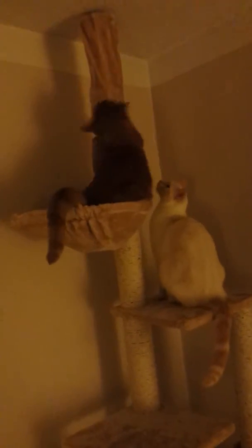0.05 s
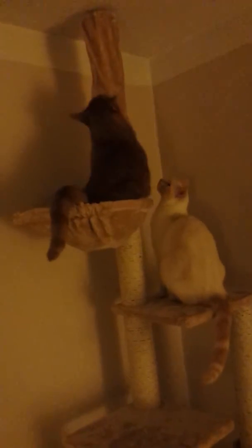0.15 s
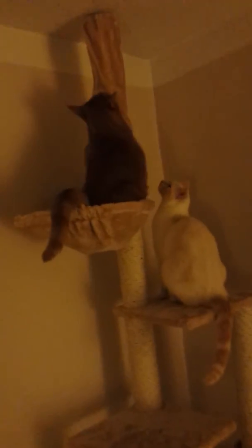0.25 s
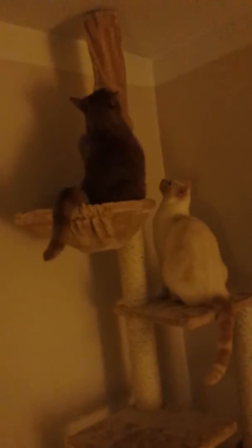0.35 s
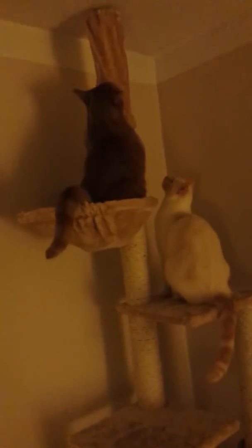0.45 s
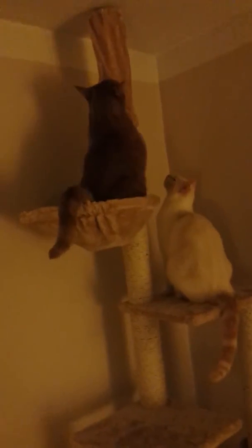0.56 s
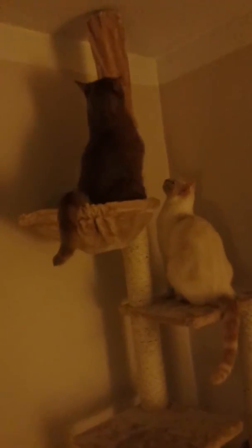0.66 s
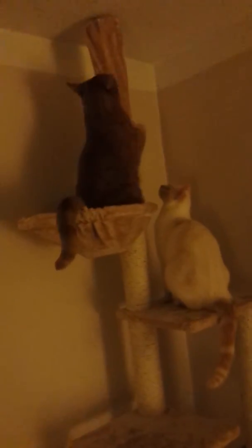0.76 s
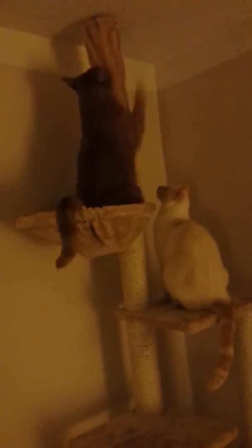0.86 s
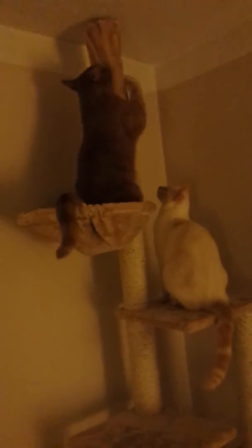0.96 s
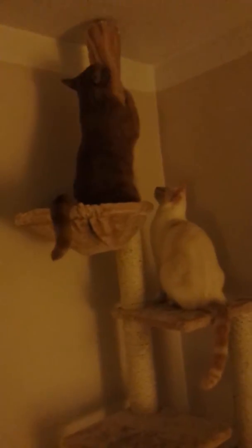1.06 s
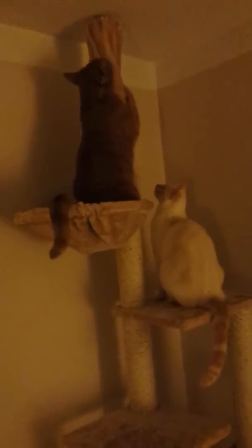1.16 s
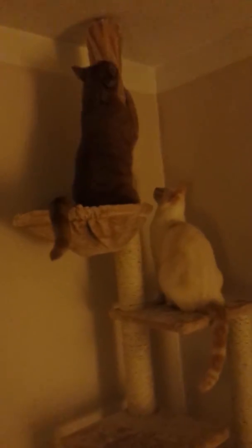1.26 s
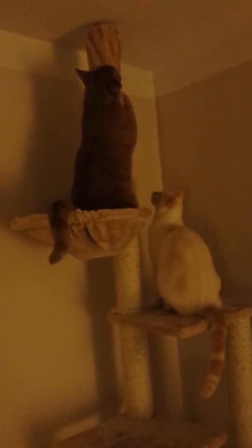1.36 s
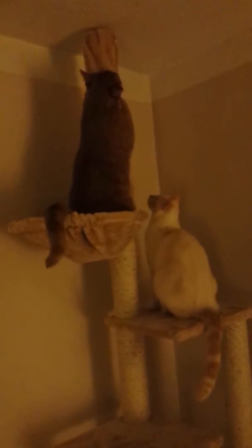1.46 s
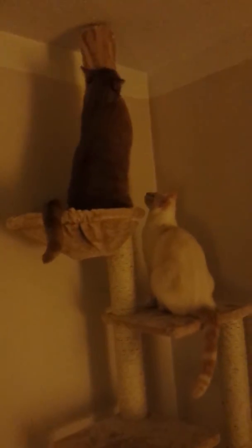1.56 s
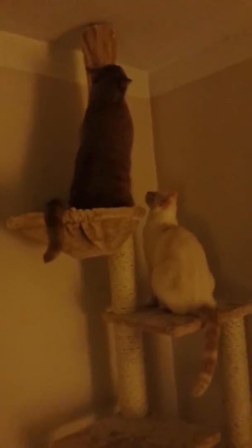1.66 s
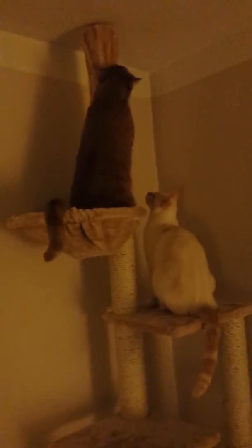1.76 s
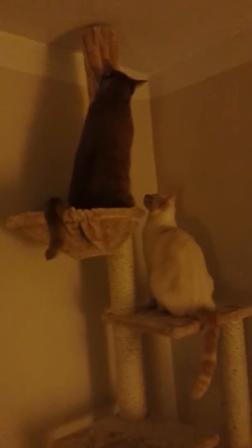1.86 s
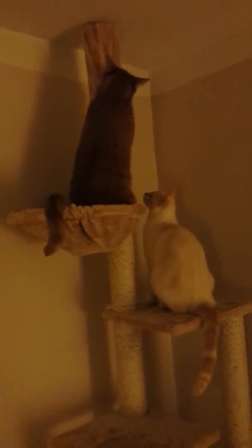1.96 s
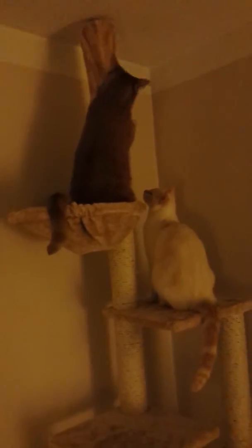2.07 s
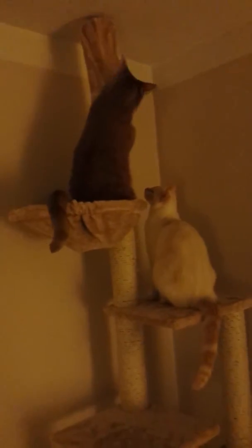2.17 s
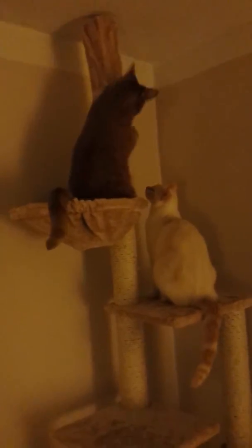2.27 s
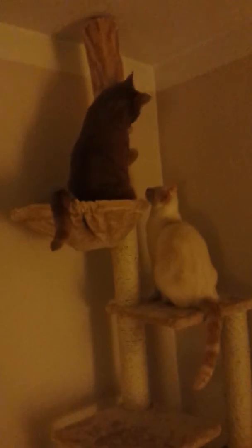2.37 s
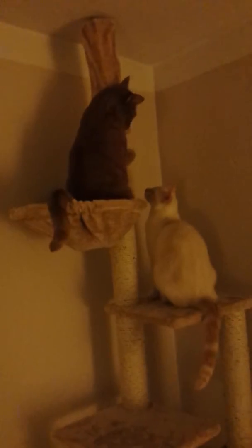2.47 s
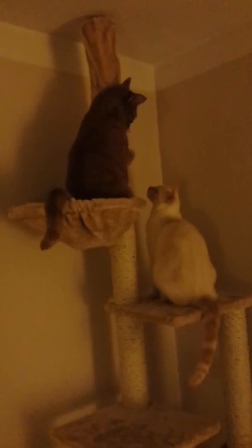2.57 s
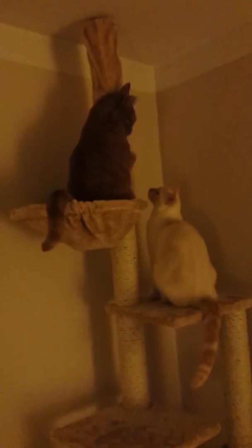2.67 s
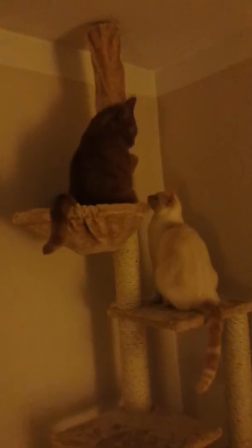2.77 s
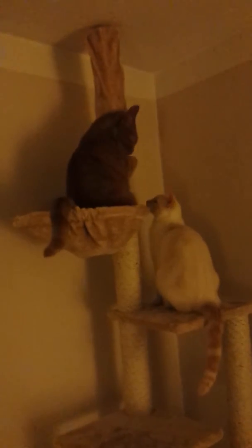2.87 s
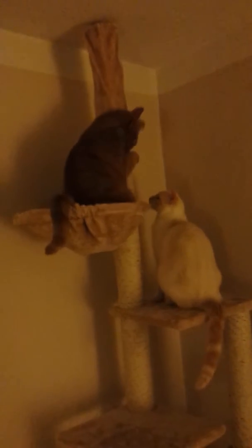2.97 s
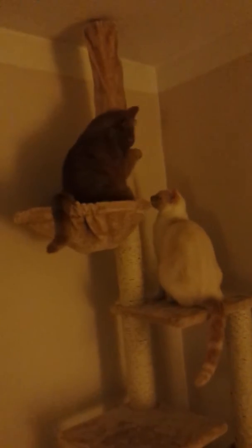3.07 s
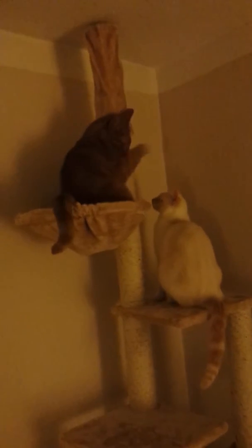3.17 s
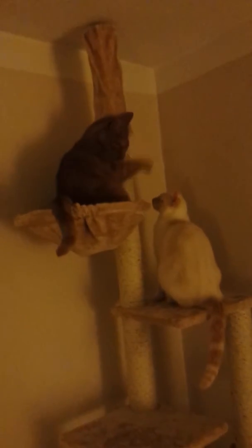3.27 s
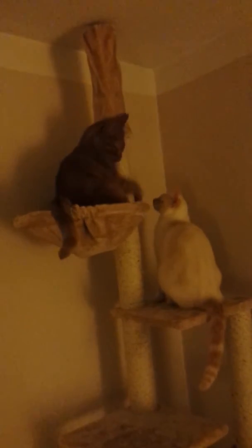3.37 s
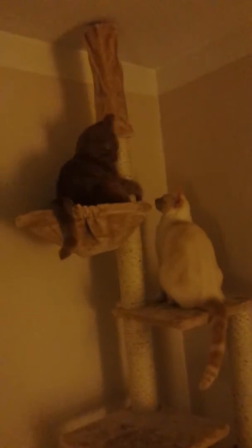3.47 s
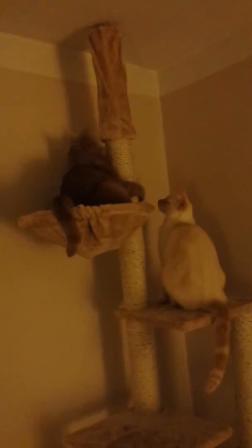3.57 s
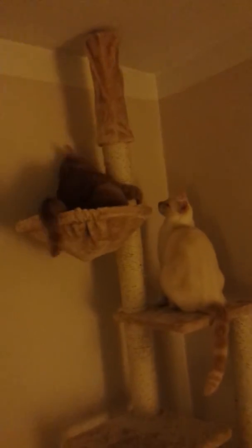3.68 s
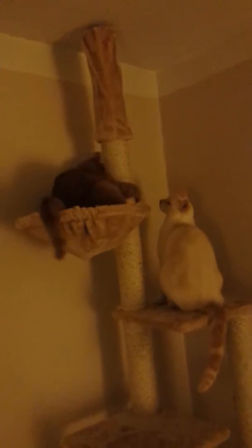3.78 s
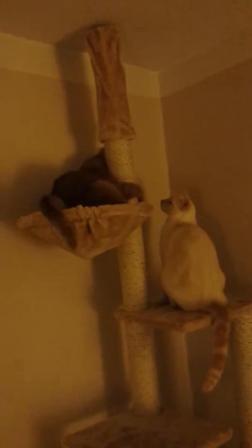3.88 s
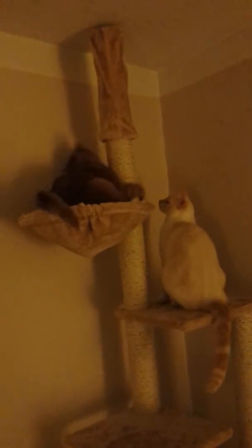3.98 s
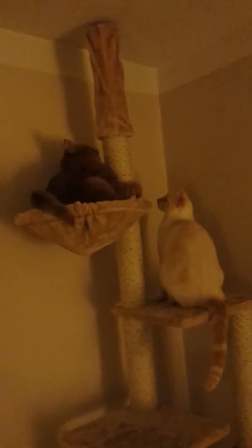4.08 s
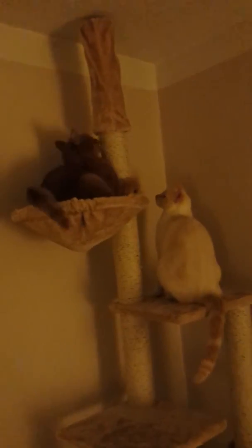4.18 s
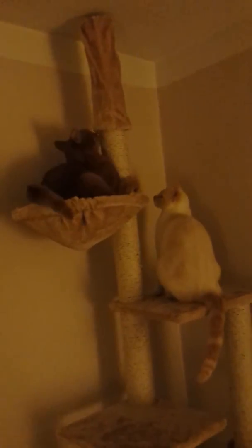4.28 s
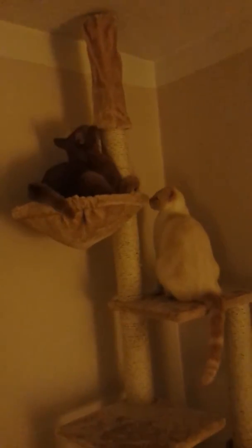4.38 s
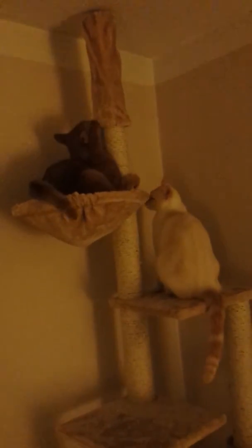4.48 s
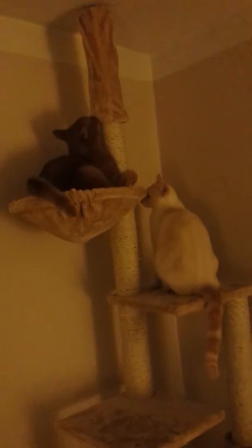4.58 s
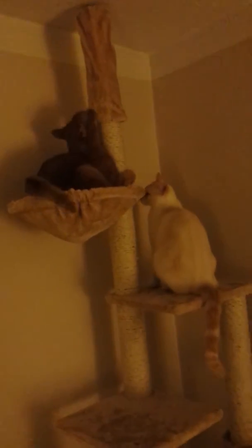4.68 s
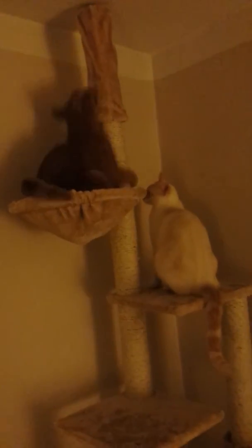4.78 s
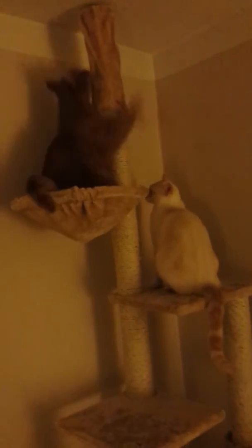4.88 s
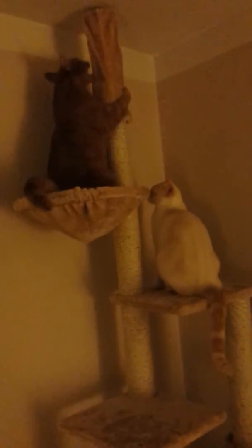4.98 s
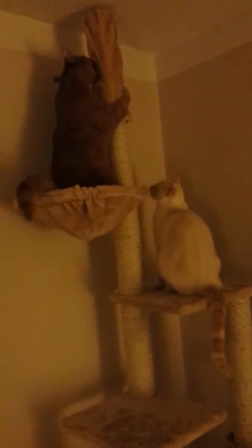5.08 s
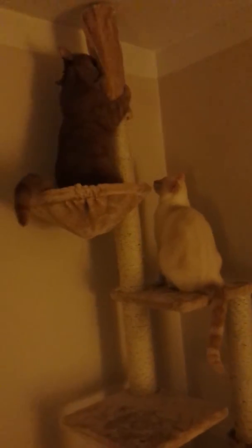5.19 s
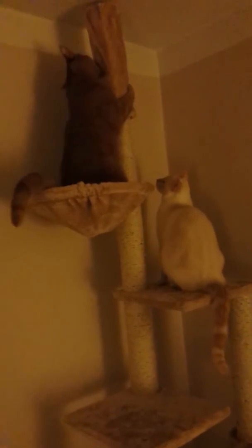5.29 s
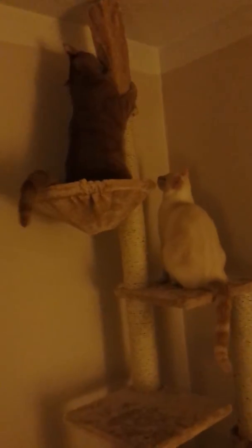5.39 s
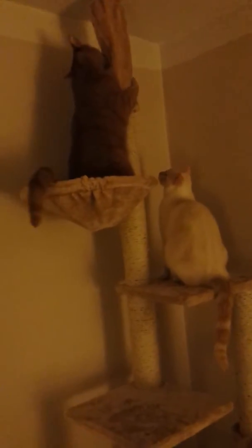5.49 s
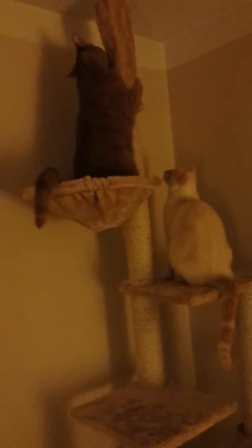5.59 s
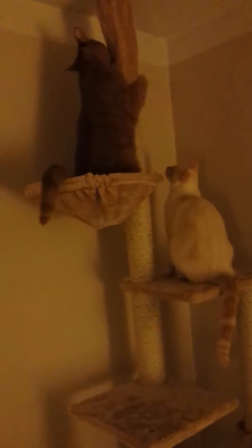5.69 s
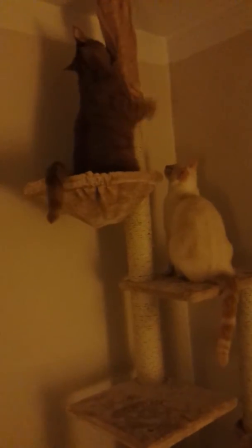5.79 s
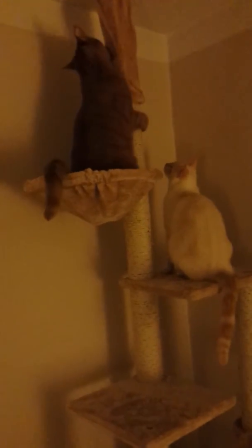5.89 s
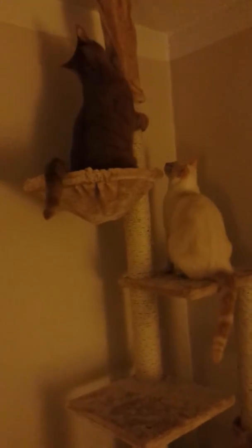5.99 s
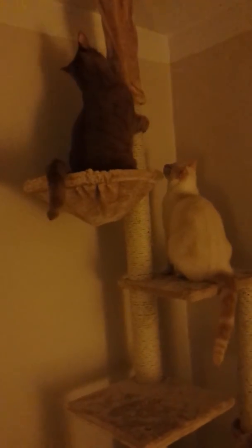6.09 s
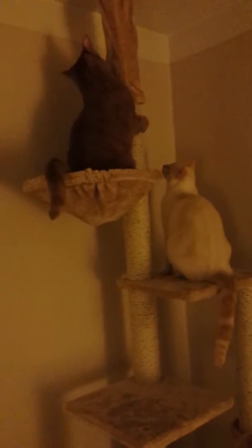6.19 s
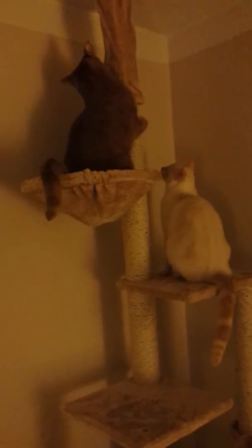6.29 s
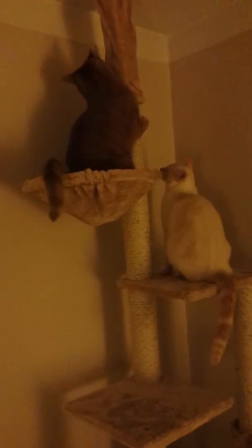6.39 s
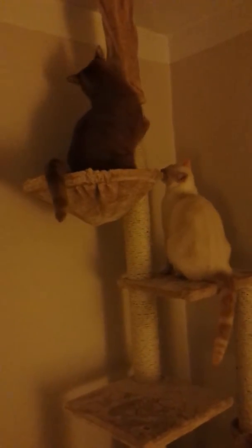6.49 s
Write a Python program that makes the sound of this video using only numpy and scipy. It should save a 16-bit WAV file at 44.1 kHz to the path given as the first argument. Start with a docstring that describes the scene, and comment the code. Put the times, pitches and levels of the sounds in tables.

```python
"""Cat on a scratching tree

A cat clambers about the top of a carpeted scratching tree in a quiet room.
Claws snag in the sisal and snap free: short noise bursts, coloured as tick, crack and pluck.
Paws and weight thump the hollow posts and boards, which ring as a set of fading sine waves.
Fur and plush rub as uneven noise, and joints creak as rough, wandering tones.
The tree stands in a corner, a little to the right, so echoes and a short room ring follow.
"""
import sys
import numpy as np
from scipy import signal
from scipy.fft import rfft, irfft
from scipy.io import wavfile
from scipy.ndimage import uniform_filter1d

SR = 44100
rng = np.random.default_rng(int(sys.argv[2]) if len(sys.argv) > 2 else 0)


def to_wav(s):
    """Save 16-bit WAV."""
    ch = np.atleast_2d(s).T  # columns
    pcm = np.round(np.clip(ch, -1, 1) * 32767)  # PCM
    wavfile.write(sys.argv[1], SR, pcm.astype(np.int16))


N = 288414
TIME = np.arange(N) / SR  # seconds


def from_db(db):
    """Turn decibels into a gain."""
    return 10 ** (np.asarray(db) / 20)


def rms_one(x):
    """Scale a sound to an average strength (rms) of 1."""
    return x / np.sqrt(np.mean(x ** 2) + 1e-20)


def at_hz(points, hz):
    """Read a table between its points, with frequency on a log axis."""
    f, value = np.transpose(points)
    return np.interp(np.log(np.maximum(hz, 1)), np.log(f), value)


def add(track, s, sound):
    """Mix a sound into a track, starting at s seconds."""
    i = int(s * SR)
    track[i:i + len(sound)] += sound[:N - i]


def delayed(x, s):
    """The same sound, s seconds later."""
    return np.pad(x, (max(round(s * SR), 0), 0))[:N]


def lowpass(x, hz):
    """Second-order low-pass: keep what lies below hz."""
    return signal.sosfilt(signal.butter(2, min(hz, .45 * SR), fs=SR, output="sos"), x)


def bandpass(x, low_hz, high_hz):
    """Keep a band of frequencies, with second-order skirts on both sides."""
    band_hz = [low_hz, min(high_hz, .45 * SR)]
    return signal.sosfilt(signal.butter(2, band_hz, "band", fs=SR, output="sos"), x)


def colour(x, spectrum, size=2048):
    """Give a sound a spectrum with a filter of unit energy that acts as early as it can (minimum phase)."""
    gain = from_db(at_hz(spectrum, np.fft.rfftfreq(size, 1 / SR)))
    # folding the cepstrum forward in time makes the filter minimum-phase
    cepstrum = irfft(np.log(gain))
    cepstrum[1:size // 2] *= 2
    cepstrum[size // 2 + 1:] = 0
    response = irfft(np.exp(rfft(cepstrum)))
    return signal.fftconvolve(x, response / np.linalg.norm(response))[:len(x)]


# how alike left and right are in sound from all around. Columns: f/Hz, likeness (1 = the same)
LIKENESS = [(100, 0.854), (300, 0.826), (550, 0.678), (1000, 0.033), (14000, 0.059)]


def diffuse(size):
    """White stereo noise from all around: long bass waves reach both sides alike, short ones do not."""
    mid, side = rfft(rng.standard_normal((2, size)))
    alike = np.clip(at_hz(LIKENESS, np.fft.rfftfreq(size, 1 / SR)), -1, 1)
    shared = np.sqrt((1 + alike) / 2) * mid
    opposed = np.sqrt((1 - alike) / 2) * side * [[1], [-1]]
    return irfft(shared + opposed, size)


# spectrum of the room's background. Columns: f/Hz, relative level/dB per Hz
QUIET = [(15, -59.5), (28, -16.5), (40, -6), (54, 1), (75, -3.5), (140, -5.5), (205, -8.5), (330, -20.5),
         (420, -19), (480, -11.5), (560, -21.5), (2000, -26.5), (4000, -28), (7000, -25.5), (14500, -30)]


def quiet_background(level_db):
    """Steady noise from all around, coloured like the quiet room, at a set rms level."""
    noise = np.array([colour(side, QUIET, size=8192) for side in diffuse(N)])
    return from_db(level_db) * rms_one(noise)


# the cat stretches, turns or settles.
# Columns: start t/s, length/s, fur on plush relative level/dB, weight on boards relative level/dB
MOVES = [(0.052, 0.094, -74.5, -73), (0.269, 0.047, -68.5, -68.5), (0.381, 0.334, -66.5, -72.5),
         (0.79, 0.386, -61, -53.5), (1.606, 0.063, -66.5, -62), (1.868, 0.039, -65, -60.5),
         (1.987, 0.1623, -62.5, -60), (2.358, 0.265, -66.5, -61.5), (3.094, 0.244, -68.5, -59.5),
         (3.438, 0.284, -63.5, -66.5), (3.993, 0.279, -72, -67.5), (4.844, 0.079, -61.5, -59.5),
         (5.093, 0.357, -60.5, -45), (5.553, 0.2415, -60.5, -52.5), (5.958, 0.122, -67, -58)]
# every move swells and dies away alike
SWELL_DB_PER_S, FADE_DB_PER_S = 134.5, 64.5


def moving():
    """Gains of fur and of weight over time: each move swells, holds and fades."""
    gains = np.zeros((2, N))
    for s, length_s, fur_db, weight_db in MOVES:
        swell_db = SWELL_DB_PER_S * (TIME - s)
        fade_db = FADE_DB_PER_S * (s + length_s - TIME)
        shape = from_db(np.clip(np.minimum(swell_db, fade_db), -100, 0))
        gains = np.maximum(gains, from_db([[fur_db], [weight_db]]) * shape)
    return gains


# ways in which the posts and boards can ring (modes).
# Columns: f/Hz, relative level/dB, time to fade by 60 dB/s
TREE_MODES = [(55.4, -11, 0.52), (96, -13, 0.23), (145.41, -5.5, 0.256), (167.8, -10, 0.0895),
              (197.48, -7, 0.183), (225.1, -2.5, 0.13), (266.34, -3, 0.103), (279.6, 0.5, 0.1296),
              (304.7, 1, 0.0892), (330.1, -1, 0.0938), (389.76, -4.5, 0.1171), (456.35, -6.5, 0.0857),
              (523.2, -2, 0.1423), (665.1, -6, 0.151), (739.6, -14.5, 0.106), (882.5, -5, 0.155),
              (1001, -7, 0.126), (1142, -8.5, 0.07), (1540, -13, .12), (1687, 2, 0.29),
              (2270, -29.5, 0.158)]


def mode_waves():
    """Every mode of the posts and boards ringing and fading at its own level, one row each."""
    t = TIME[:SR // 2]
    hz, db, t60 = np.transpose(TREE_MODES)[:, :, None]
    return from_db(db - 60 * t / t60) * np.sin(2 * np.pi * hz * t)


def tree_ring(waves, centre_hz, scatter_db, below_db=3.0, above_db=10.5):
    """One blow on the tree: modes weaken per octave away from the contact's centre; unit energy."""
    octaves = np.log2(np.array(TREE_MODES)[:, 0] / centre_hz)
    slope_db = np.minimum(below_db * octaves, -above_db * octaves)
    db = slope_db + scatter_db * rng.standard_normal(len(waves))
    signs = rng.choice([-1, 1], len(waves))
    ring = (signs * from_db(db)) @ waves
    return ring / np.linalg.norm(ring)


def friction(per_s, spread_db, smooth):
    """Fibres catch and slip at random, over a smooth hiss; rms 1."""
    slips_now = rng.random(N) < per_s / SR
    sizes = from_db(spread_db * np.minimum(rng.exponential(1, N), 5)) * slips_now
    # the power of each slip dies away over about a millisecond
    slips = signal.lfilter([1], [1, -np.exp(-1 / (0.00108 * SR))], sizes ** 2 + 1e-18)
    strength = np.sqrt(slips / slips.mean() + smooth ** 2)
    return rms_one(strength * rng.standard_normal(N))


# spectrum of rubbed plush. Columns: f/Hz, relative level/dB per Hz
PLUSH = [(400, -4), (1000, -2), (2000, -4.5), (4500, -7), (6300, 2.5), (7500, 1), (9500, -6), (14500, -12)]
# paws swiping across the plush. Columns: start t/s, length/s, relative level/dB
SWIPES = [(0.718, 0.059, -54), (0.813, 0.04, -60), (0.882, 0.0436, -53.5), (1.016, 0.069, -52.5),
          (1.576, 0.0326, -61.5), (1.788, 0.0555, -59.5), (1.872, 0.0544, -60), (2.503, 0.0274, -63),
          (4.793, 0.0184, -57), (4.992, 0.086, -56.5), (5.094, 0.0465, -50), (5.713, 0.103, -57),
          (6.008, 0.0534, -59)]
# between moves the fur barely stirs: level relative to the same scale as the moves
STIR_DB = -91.5


def rubbing(hiss_gain_db, swipe_gain_db, drag_gain_db):
    """Fur hisses, swiping paws rasp, and the shifting weight's friction makes the boards murmur."""
    strokes = np.zeros(N)
    for s, length_s, db in SWIPES:
        stroke = np.sqrt(np.hanning(int(length_s * SR)))
        add(strokes, s, from_db(db + swipe_gain_db) * stroke)
    brush, weight = moving()
    fur_gain = (brush + from_db(STIR_DB)) * from_db(hiss_gain_db)
    fur = friction(per_s=250, spread_db=2.5, smooth=0.577) * fur_gain
    rasp = friction(per_s=600, spread_db=0.0, smooth=0.29) * strokes
    scrape = friction(per_s=300, spread_db=1.0, smooth=1.0)
    boards = tree_ring(mode_waves(), centre_hz=387, scatter_db=1.0)
    drag = signal.fftconvolve(scrape, boards)[:N]
    return colour(fur + rasp, PLUSH), rms_one(drag) * weight * from_db(drag_gain_db)


def fibre_burst(length_s):
    """A claw rips fibres within milliseconds: noise nearly even over frequency, of unit energy."""
    t = TIME[:SR // 20]
    swell = t * np.exp(-t / max(length_s, .0001))
    # keep only the phases of a short noise, so that all frequencies are equally strong
    phases = np.angle(rfft(rng.standard_normal(len(t)) * swell))
    burst = irfft(np.exp(1j * phases), len(t)) * np.sqrt(swell)
    return burst / np.linalg.norm(burst)


def claw_ping(rip, ring_db, low_hz=6200, high_hz=7900, width_hz=450):
    """The claw itself rings for a moment, at another pitch each time; unit energy."""
    hz = rng.uniform(low_hz, high_hz)
    ring = signal.lfilter(*signal.iirpeak(hz, hz / width_hz, fs=SR), rip)
    out = rip + from_db(ring_db) * ring
    return out / np.linalg.norm(out)


# the faint copies of a burst start at most this long before it
LEAD_S = .012


def soft_onset(rip, weaker_db, spread_db, count=3):
    """Faint random copies of the burst come up to 12 ms before it and soften its onset."""
    lead = int(LEAD_S * SR)
    out = np.pad(rip, (lead, 0))
    for when, size in rng.random((count, 2)):
        i = int(when * lead)
        out[i:i + len(rip)] += from_db(weaker_db - spread_db * size) * rip
    return out


# claws snapping free, with relative levels. Columns: t/s, crack/dB, tug on the post/dB,
# fine tick of the claw tip/dB, left minus right/dB (before the share used for panning)
SNAGS = [(0.3396, -46, -75, -66, -2.5), (0.4973, -44, -73, -65.5, 6.5), (0.5968, -57.5, -65, -67, -4.5),
         (0.821, -45.5, -71, -74.5, -6.5), (0.8952, -40.5, -44.5, -62, -6.5),
         (0.9616, -36.5, -41, -69.5, -7), (1.1115, -48.5, -46, -73.5, -8.5),
         (1.154, -25.5, -26.5, -60.5, -16), (1.6214, -47.5, -50.5, -62, -6.5),
         (1.8944, -46, -67.5, -69, -4), (2.0246, -36, -48.5, -56, 1.5), (2.0628, -44, -42.5, -73.5, 3),
         (2.3011, -42.5, -55.5, -62.5, 4), (2.4302, -47.5, -60, -69, -4), (2.5071, -37.5, -50.5, -57, -5.5),
         (2.5227, -31, -55.5, -75.5, 6.5), (2.5765, -44, -66, -62, -7), (2.7687, -38, -59.5, -56.5, 3),
         (2.9231, -53.5, -89, -81, -7.5), (3.0736, -49.5, -54, -68, 0), (3.1949, -36.5, -53, -56.5, -1.5),
         (3.681, -40.5, -69, -62, 3.5), (3.7672, -45, -59, -62, 0.5), (4.114, -52.5, -63.5, -78, -7),
         (4.1795, -49, -51, -72.5, 5.5), (4.8865, -37.5, -60, -55.5, -1.5), (4.8983, -42.5, -57.5, -55, -6),
         (5.0255, -44.5, -43.5, -78, -10), (5.1456, -33.5, -34, -56.5, -5.5),
         (5.1708, -29, -28.5, -72, 11.5), (5.3331, -24, -22.5, -71.5, -4),
         (5.5445, -33, -42.5, -51.5, -7.5), (5.7102, -40, -57, -69, 4), (5.7633, -39, -44.5, -56, -9),
         (5.7788, -41, -56, -65, -2.5), (5.9147, -45, -56, -66, -10.5), (6.0667, -40.5, -56.5, -60, -8.5),
         (6.1316, -53.5, -86, -79, -17)]
# spectra of snapping fibres, plucked rope and the claw tip's tick.
# Columns: f/Hz, relative level/dB per Hz
CRACK = [(800, -17.5), (2000, -3), (3200, -5), (4500, -2), (6200, 3), (7600, 1), (9500, -9.5), (14500, -55)]
PLUCK = [(200, -1), (500, 3), (900, 2), (1500, -5), (2200, -7), (3000, -9), (9000, -47.5)]
TIP = [(2000, 4.5), (6000, -8.5), (10000, 5.5), (14500, -10.5)]
# a harder tug plucks the rope harder: dB of pluck per dB of tug, counted from a firm tug
FIRM_TUG_DB, PLUCK_PER_TUG = -25, 0.7305


def claws(rip_s, pluck_s, tip_s, crack_db, pluck_db, tip_db, pan_share):
    """Each snag is a tick of the claw tip, a bright crack of fibres and a duller pluck of the rope."""
    cracks, plucks, tips = np.zeros((2, N)), np.zeros(N), np.zeros(N)
    for s, sharp_db, tug_db, fine_db, left_db in SNAGS:
        rip = claw_ping(fibre_burst(rip_s), ring_db=3.5)
        rip = soft_onset(rip, weaker_db=-16, spread_db=21.5)
        for side, sign in zip(cracks, (.5, -.5)):
            side_db = sharp_db + crack_db + sign * pan_share * left_db
            add(side, s - LEAD_S, from_db(side_db) * rip)
        rope_db = pluck_db + PLUCK_PER_TUG * (tug_db - FIRM_TUG_DB)
        add(plucks, s, from_db(rope_db) * fibre_burst(pluck_s))
        add(tips, s, from_db(fine_db + tip_db) * fibre_burst(tip_s))
    cracks = np.array([colour(side, CRACK) for side in cracks])
    return cracks, colour(plucks, PLUCK), colour(tips, TIP)


# after a harder tug the post swings back later and deeper: delay and pitch at a firm tug,
# dB of tug that double the delay, dB of tug that lower the pitch by an octave
RECOIL_S, RECOIL_DOUBLES_DB = 0.00687, 9
RECOIL_HZ, RECOIL_OCTAVE_DB = 368, 79


def recoils():
    """The post swings back after every snag: a list of blows as (t/s, relative level/dB, f/Hz)."""
    blows = []
    for s, _, tug_db, _, _ in SNAGS:
        harder_db = tug_db - FIRM_TUG_DB
        delay_s = RECOIL_S * 2 ** (harder_db / RECOIL_DOUBLES_DB)
        hz = RECOIL_HZ * 2 ** (-harder_db / RECOIL_OCTAVE_DB)
        blows.append((s + delay_s, tug_db, hz))
    return blows


# paws and body landing on the tree.
# Columns: t/s, relative level/dB, f/Hz that the contact drives best
THUMPS = [(0.614, -45, 304), (0.729, -46.5, 284), (0.785, -55.5, 228), (0.923, -43, 171),
          (0.990, -52.5, 230), (1.058, -40.5, 292), (1.113, -33, 347), (1.166, -28.5, 346.6),
          (1.218, -40.5, 280), (1.298, -57, 283), (1.588, -57.5, 593), (1.777, -57, 550), (1.871, -58, 610),
          (2.050, -47, 270), (2.082, -40, 299), (2.532, -38, 363), (3.616, -47.5, 164.4),
          (3.632, -45, 148.7), (3.676, -50.5, 164), (3.769, -52, 282), (4.187, -47, 345),
          (4.785, -44.5, 266), (5.060, -44.5, 303), (5.294, -38.5, 402), (5.676, -39, 350)]


def paws(scatter_db, blow_db, pad_ratio, give_cycles):
    """Padding gives for a few milliseconds, longest for the deepest thuds: blows swell, then ring."""
    out, waves = np.zeros(N), mode_waves()
    for s, db, centre_hz in THUMPS + recoils():
        ring = tree_ring(waves, centre_hz, scatter_db)
        swell = 1 - np.exp(-(TIME[:len(ring)] * centre_hz / give_cycles) ** 2)
        blow = bandpass(ring * swell, centre_hz / pad_ratio, centre_hz * pad_ratio)
        add(out, s, from_db(db + blow_db) * blow / np.linalg.norm(blow))
    return out


# taut fabric and screwed joints creaking under load. Columns: t/s, relative level/dB, f/Hz,
# time to fade by 60 dB/s, roughness (rms wander as a share of the pitch)
CREAKS = [(.745, -52.5, 1277, 0.05, 0.323), (.962, -33, 1451, 0.1311, 0.3415),
          (.962, -36.5, 2197, 0.0921, 0.125), (1.19, -42.5, 1705, 0.1738, 0.0285),
          (2.072, -42, 525, 0.27, 0.0278), (2.07, -46.5, 820, 0.1771, 0.087),
          (3.072, -56, 1099, 0.32, 0.093), (3.42, -51, 1064, 0.01, 0.042), (4.18, -49, 1625, 0.04, 0.041),
          (4.905, -55.5, 1081, 0.25, 0.09), (5.11, -49.5, 1095, 0.28, 0.352),
          (5.175, -38.5, 852, 0.15, 0.1555), (5.345, -45.5, 3003, 0.2617, 0.196),
          (5.674, -54, 1008, 0.4, .3), (6.014, -61, 1294, 0.5649, 0.314)]


def creaks(gain_db, rise_s):
    """Stick and slip drives one resonance: a rough, wandering tone that fades away."""
    out, t = np.zeros(N), TIME[:SR // 3]
    for s, db, hz, t60, rough in CREAKS:
        wander = rms_one(lowpass(rng.standard_normal(len(t)), hz / 3))
        pitch = hz * (1 + rough * wander)
        tone = np.sin(2 * np.pi * np.cumsum(pitch) / SR)
        rise = 1 - np.exp(-t / rise_s)
        add(out, s, tone * rise * from_db(db + gain_db - 60 * t / t60))
    return out


# how long the room rings. Columns: f/Hz, time to fade by 60 dB/s
ROOM_T60 = [(100, 0.516), (300, 0.214), (1000, 0.377), (3000, 0.268), (7000, 0.206), (14000, 0.13)]


def room_tail(build_s, count=14, size=15):
    """Dense echoes that build up and die band by band, about equally strong at all frequencies."""
    t = TIME[:SR // 2]
    noise = rfft(diffuse(len(t)))
    hz = np.fft.rfftfreq(len(t), 1 / SR)
    edges = np.geomspace(25, 22000, count)
    tail = 0
    for low, high in zip(edges, edges[1:]):
        band = irfft(noise * ((hz >= low) & (hz < high)), len(t))
        tail = tail + band * from_db(-60 * t / at_hz(ROOM_T60, np.sqrt(low * high)))
    spectrum = rfft(tail * (1 - np.exp(-t / build_s)))
    # divide by the smoothed spectrum to even out the frequencies
    power = uniform_filter1d(np.mean(abs(spectrum) ** 2, axis=0), size)
    fade = np.minimum(1, 2 - 2 * t / t[-1]) ** 2
    return fade * irfft(spectrum / np.sqrt(np.maximum(power, 1e-6)), len(t))


# echoes off the corner walls and ceiling. Columns: delay t/s, relative level/dB
ECHOES = [(.0042, -9.5), (.0095, -13.5), (0.0157, -9), (.026, -4.5)]
LEFT_LAG_S = .00024


def in_room(x, wet_db, echo_db, right_db, build_s, soak_hz):
    """Direct sound and echoes reach the right first; the room rings on, furnishings soaking up the top."""
    left, right = np.broadcast_to(x, (2, N))
    centre = (left + right) / 2
    echoes = sum(from_db(db + echo_db) * delayed(centre, s) for s, db in ECHOES)
    near = np.array([delayed(left + echoes, LEFT_LAG_S), right + echoes])
    near = near * from_db([[-right_db / 2], [right_db / 2]])
    dulled = signal.lfilter(*signal.butter(1, min(soak_hz, .45 * SR), fs=SR), centre)
    tail = signal.fftconvolve(dulled[None], room_tail(build_s), axes=1)[:, :N]
    return near + from_db(wet_db) * tail


def scene():
    """Rubbing, claws, paws and creaks in the room, over its quiet background."""
    quiet = quiet_background(level_db=-65.56)
    hiss, drag = rubbing(hiss_gain_db=-1.5, swipe_gain_db=-2, drag_gain_db=-5)
    cracks, plucks, tips = claws(rip_s=0.001134, pluck_s=0.00136, tip_s=0.000798,
                                 crack_db=11.0, pluck_db=-8.5, tip_db=24, pan_share=0.773)
    body = paws(scatter_db=1.0, blow_db=28.5, pad_ratio=3.13, give_cycles=1.34) + drag
    creak = creaks(gain_db=0.5, rise_s=0.0005)
    # a positive right_db makes the direct sound and echoes louder on the right
    return (quiet
            + in_room(hiss, wet_db=3.0, echo_db=-29.5, right_db=10.0, build_s=0.0013, soak_hz=12020)
            + in_room(cracks, wet_db=4.5, echo_db=-10, right_db=9.0, build_s=0.00112, soak_hz=4150)
            + in_room(tips, wet_db=3.5, echo_db=-21, right_db=14.5, build_s=0.0013, soak_hz=12000)
            + in_room(plucks, wet_db=3.5, echo_db=-11, right_db=-5.5, build_s=0.00117, soak_hz=8960)
            + in_room(body, wet_db=-4.5, echo_db=-8, right_db=1.5, build_s=0.0128, soak_hz=4000)
            + in_room(creak, wet_db=-1.5, echo_db=-15, right_db=-1.0, build_s=0.0012, soak_hz=9000))


CUTOFF_HZ = 14700


def record(dry):
    """Cut the top steeply, above the cutoff."""
    return signal.sosfilt(signal.ellip(10, .2, 70, CUTOFF_HZ, fs=SR, output="sos"), dry)


dry = scene()
out = record(dry)
to_wav(out)
```